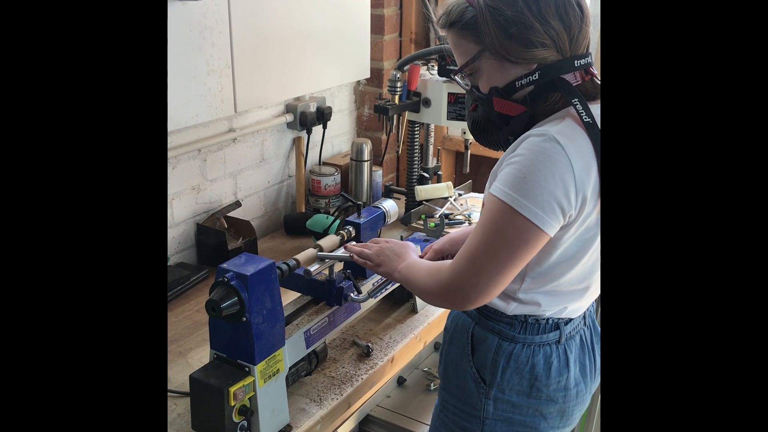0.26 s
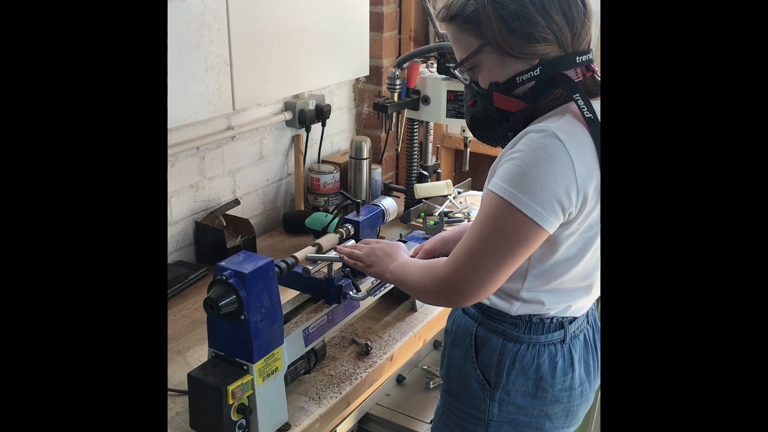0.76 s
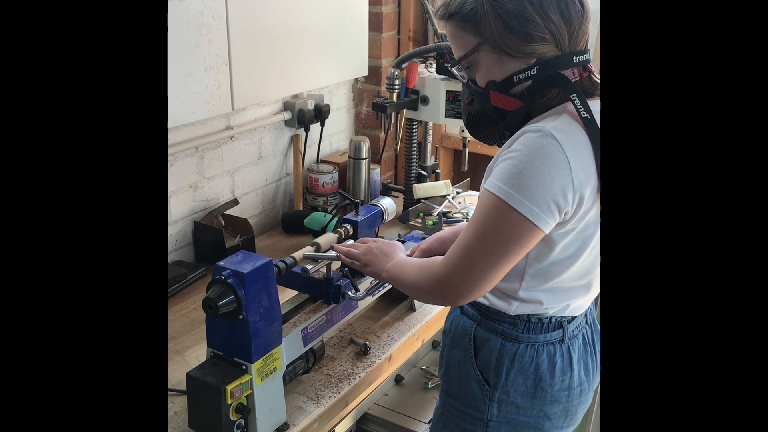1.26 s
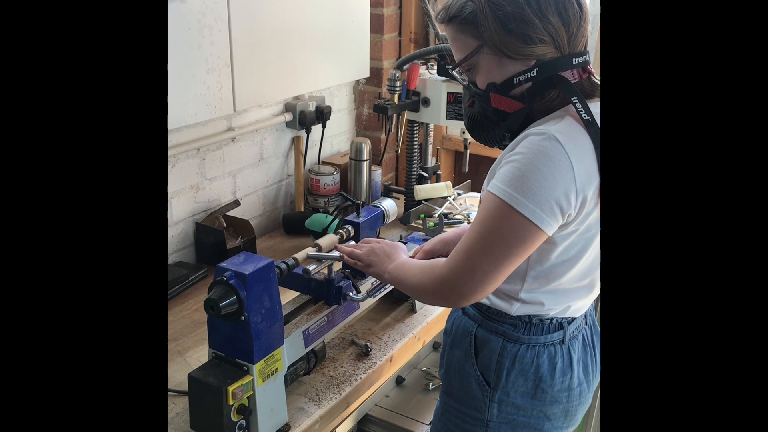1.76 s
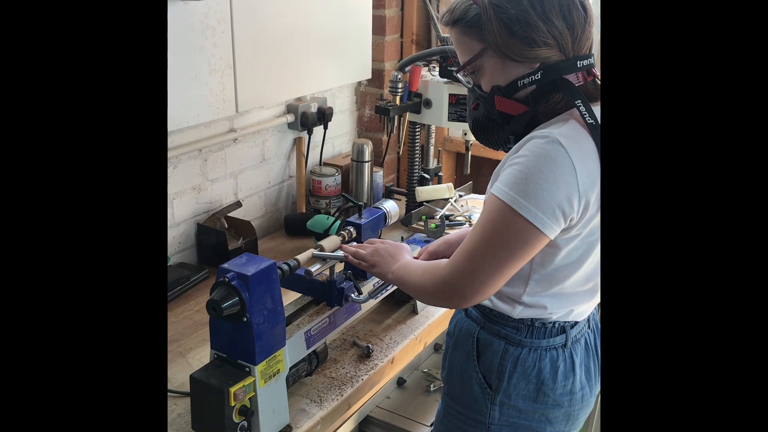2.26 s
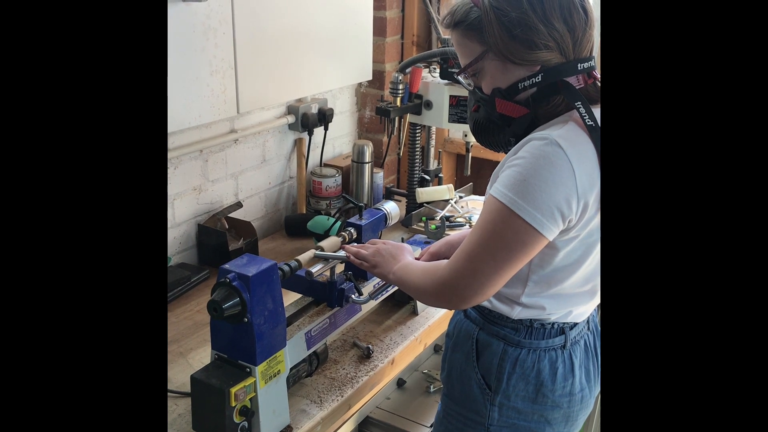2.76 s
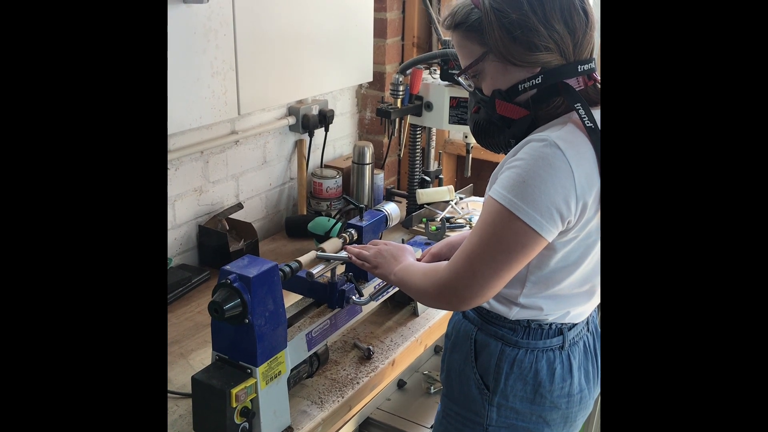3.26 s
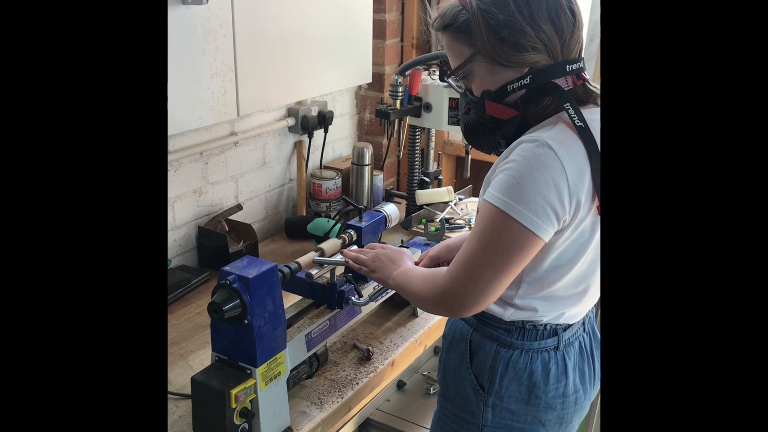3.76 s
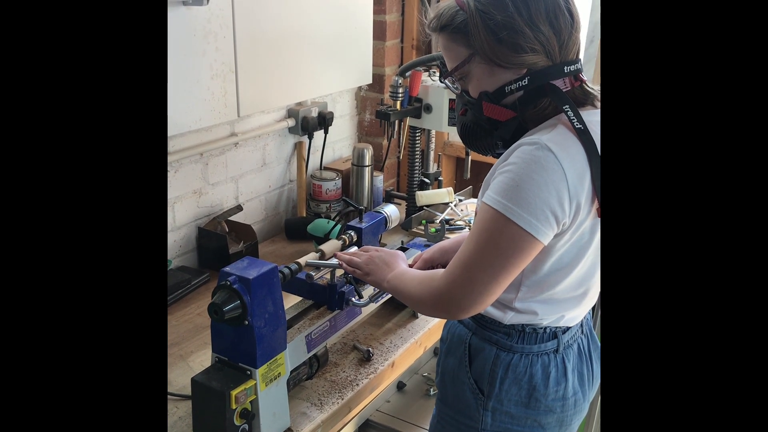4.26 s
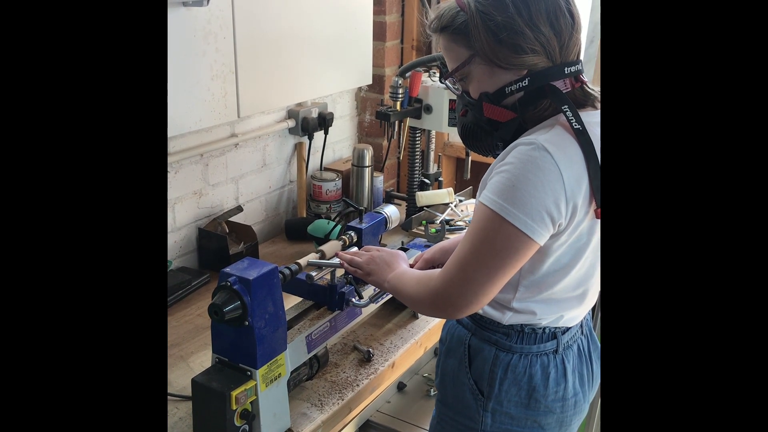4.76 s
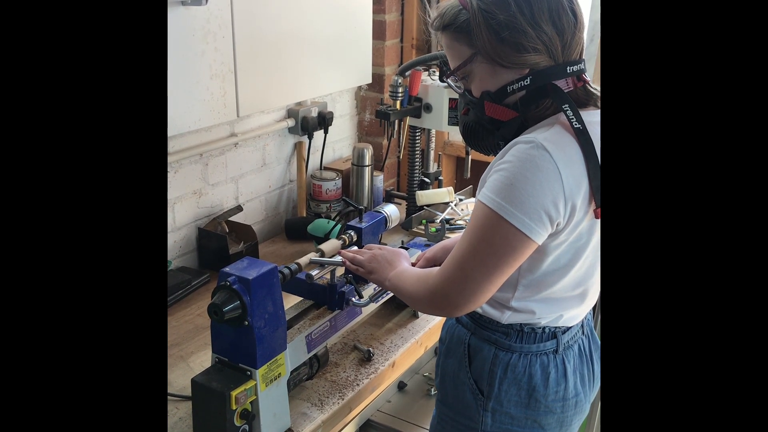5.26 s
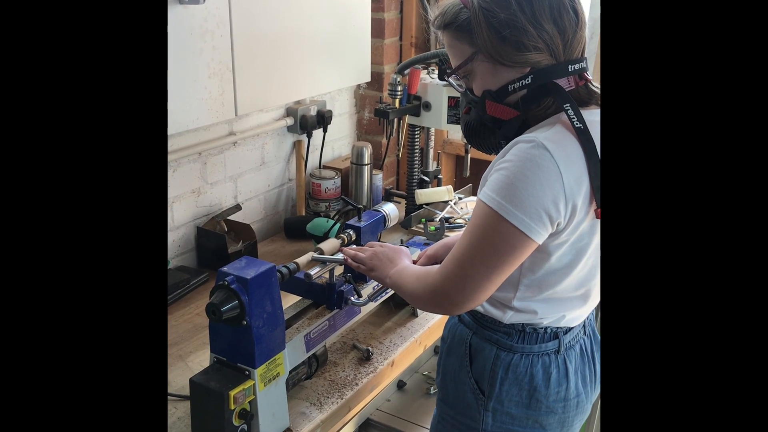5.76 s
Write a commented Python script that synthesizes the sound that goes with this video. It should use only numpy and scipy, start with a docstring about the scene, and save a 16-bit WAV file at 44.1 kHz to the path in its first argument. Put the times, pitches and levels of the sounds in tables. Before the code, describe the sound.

A small wood lathe runs throughout, heard close in a fairly dry workshop: a motor whine, a low electrical hum, a hollow drone and hissing bearings. At the very start a tool's scrape fades as it leaves the wood, and the lathe runs free. At about 1.3 seconds the tool bites into the spinning wood with a rough, hissing rasp that pulses rapidly, shaking the machine and making the steel chatter. Splinters crackle irregularly, with tiny high squeaks near 1.8 and 3 seconds. The motor's pitch sags slightly under the load. At about 3.3 seconds the tool lifts and the motor recovers. A second, slightly louder cut begins at 4.3 seconds with a brief lower squeak, chatters hardest around 4.5 seconds, throws more chips, and continues to the end at about 6 seconds.

```python
"""Wood lathe in a home workshop

Close to a small belt-driven lathe, one microphone hears motor whine, mains hum and hissing bearings.
A hand tool leaves the spinning blank, then makes two long cuts. Tearing fibres shake the lathe bed,
ring the tool and hiss; a high spot on the blank bites once a turn, and the load slows the motor."""
import sys
import numpy as np
from scipy import signal
from scipy.fft import rfft, irfft
from scipy.io import wavfile
from scipy.ndimage import uniform_filter1d

SR = 44100
rng = np.random.default_rng(int(sys.argv[2]) if len(sys.argv) > 2 else 0)


def int16_out(signal):
    """Quantize to a 16-bit WAV file."""
    q = np.round(np.clip(np.atleast_2d(signal).T, -1, 1) * 32767)
    wavfile.write(sys.argv[1], SR, q.astype(np.int16))


N = 264592
TIME = np.arange(N) / SR
BINS = np.fft.rfftfreq(16384, 1 / SR)
IDLE_HZ, ROTOR_SLOTS = 28.39, 24  # of the motor
PULLEY_RATIO = .607  # spindle turns for each motor turn

# Passes of the tool. Each row: times in seconds at which it touches, starts to lift and chatters most,
# then that chatter in dB relative to the cut.
TOOL_PASSES = [(-.5, .02, -4, -13), (1.256, 3.254, 1.57, -3), (4.321, 6.1, 4.5, 0)]
# How the hand guides the tool. Each row: time in seconds, strength in dB, depth (extra shake) in dB,
# sharpness (extra hiss) in dB, runout (bite of the high spot) in dB, place of the high spot in turns.
HAND_LIFT_OFF = [(0.0034, -29.5, -4, -5.5, 2.5, 0.81)]
HAND_FIRST_CUT = [(1.25, -37.5, -8, 4.5, 13, 0.56), (1.31, -28.5, -3, -7, 20.6, 0.49),
                  (1.6, -29, -6.5, -3, 6.1, 0.067), (1.87, -27, -2, -3.5, 3.9, 0.24),
                  (2.28, -29, -1.5, -3, 4.4, 0), (2.56, -28.5, -1.5, -4, 8.9, 0.00054),
                  (2.87, -27.5, 0.5, -6, 14, 0.011), (2.97, -31.5, -0.5, 1.5, 3.7, 0.077),
                  (3.22, -29.5, 0.5, -7.5, 18, .0)]
HAND_SECOND_CUT = [(4.33, -28.5, -10.5, -3.5, 2, .8), (4.55, -26, -3, -6, 3.3, 0.33),
                   (4.76, -24.5, -6, -8.5, 5.9, 0.19), (5.13, -25, -3, -7, 4.9, .45),
                   (5.19, -30.5, -2, -5, 2.9, 0.96), (5.27, -25, -6, -6, 1, 0.4),
                   (5.72, -26, -1, -6, 6.5, 0.51), (5.83, -31.5, -0.5, -3.5, 16, 0.48),
                   (6, -25.5, -1.5, -3.5, 6.1, 0.7)]
# The edge catches and a chip flies. Each row: start in seconds, jolt in dB, splinter level in dB.
EDGE_CATCHES = [(1.299, 0, -28), (1.406, 4, -35), (1.772, 1, -23), (1.823, 3.5, -25.5), (2.462, 3.5, -26),
                (2.579, 4.5, -30), (2.635, 3, -25.5), (2.755, 2, -26.5), (2.812, 4, -26),
                (3.226, 2.5, -30.5), (4.49, 5, -23), (4.605, 2, -21), (4.661, 4, -27), (4.886, -7, -34),
                (5.673, 1.5, -20.5), (5.737, 3, -30), (5.973, 1.5, -23.5)]
# The edge sticks and slips. Each row: middle and half length in seconds, pitch in Hz, level in dB.
EDGE_SQUEAKS = [(1.269, 0.015, 735, -31), (1.84, 0.013, 3536, -26), (2.947, 0.012, 3344, -24.5),
                (2.985, 0.055, 5110, -36), (3.079, 0.01, 3900, -26.5), (4.339, 0.027, 730, -26)]

# Resonances of the parts. Each row: frequency in Hz, width in Hz, relative level in dB.
BED_MODES = [(71.2, 9.1, -3.5), (85.5, 12, -10.5), (103.7, 16, -16), (137, 13, -11.5), (164, 19, -24.5),
             (451.2, 22.6, -7.5), (510, 76, -18)]  # lathe bed on its bench
BLANK_MODES = [(302.5, 14, -3), (319, 38, -8.5), (353.8, 48, -3), (395.4, 45, -6)]  # wood bending between its centres
REST_MODES = [(258.8, 19, 1.5), (274.5, 34.3, 2.5), (630.7, 8.3, -1.5), (762.6, 103, 0.5), (848, 152, -4.5),
              (945, 104, -1), (1008, 58, -3.5), (1135, 110, -4), (1263, 70, -11), (1343, 95, -6),
              (1544, 370, -12.5), (1636, 23, -4.5), (1720, 63, 0), (1810, 170, -11), (2190, 480, -18.5),
              (2238, 48, -6), (2360, 130, -9.5), (2454, 124, -4.5), (2634, 165, -11)]  # tool rest
SHANK_MODES = [(237.8, 8.8, 10.5), (1140, 110, -6.5), (1663, 53, 9), (1730, 84, 0), (1829, 91, 1),
               (2233, 82, -4), (2654, 76, -3.5), (5135, 100, -3), (5300, 150, -13.5), (7040, 140, -8),
               (10250, 210, -18), (11770, 180, -11.5)]
TOOL_MODES = [(3146, 50, 5), (3393, 82, 4.5), (3514, 57, 4.5), (3920, 154, 2.5), (4180, 70, 5.5),
              (5105, 72, 8), (5440, 57, -37), (5935, 78, 6), (6730, 60, 4.5), (7230, 230, 6),
              (10200, 390, -43), (11860, 760, -30.5), (15400, 500, -32)]
TING_MODES = [(5207, 66, 19), (7220, 470, 11), (9980, 130, 8.5), (12600, 300, -2), (12300, 700, -13),
              (16000, 500, -10)]  # top of the steel's range, rung by splinters
CASING_MODES = [(735, 32, 2), (717, 53, -3)]  # motor casing
HOUSING_MODES = [(145, 51, 3), (264, 45, -0.5), (846, 160, -9.5), (1139, 40, -5), (1370, 68, -8),
                 (2390, 43, -41), (4153, 144, -7.5), (4600, 54, -9), (4975, 210, -5), (5420, 180, -2),
                 (6180, 120, -14.5), (6100, 410, -8.5), (7640, 310, -4), (8320, 560, -3.5), (8480, 44, -1),
                 (9330, 79, -14), (11020, 120, -6), (11730, 230, -2.5), (13960, 220, -24)]  # bearing housing
# Broad noise colours. Each row: frequency in Hz, relative spectral density in dB.
RASP_SPECTRUM = [(1500, -33), (2800, -6), (4500, -3), (6500, -4), (7400, -33), (8200, -39.5), (10000, -34),
                 (12500, -45), (15500, -16)]  # tearing fibres
SPLINTER_SPECTRUM = [(200, -6), (750, -3), (1900, 0.5), (3000, 0), (5000, 7), (7300, -2.5), (8500, -2),
                     (12000, -2.5), (15500, -19)]
RUNNING_SPECTRUM = [(15, -77), (25, -13), (91, -8), (194, -10.5), (403, -10.5), (557, -12), (729, -15),
                    (1040, -14), (1360, -13.5), (1590, -14.5), (2260, -14), (2660, -13.5), (3680, -19.5),
                    (8270, -11.5), (15800, -17.5)]  # rubbing in the machine

# Whine of the rotor slots. Each entry: level in dB of harmonic 1, 2, 3, ..
SLOT_WHINE_DB = [-63, -56.5, -53, -47.5, -60.5, -73, -60.5, -73, -55.5, -55.5, -53.5, -67]
# Tones of bearings and drive. Each row: multiple of the motor speed, level in dB.
SHAFT_TONES = [(10.88, -58), (13.83, -54.5), (14.5, -55), (26.06, -52), (28.95, -57.5), (32.55, -60),
               (34, -60.5), (52.6, -84), (168, -63), (203.6, -51.5), (264, -71), (392.7, -58.5)]
# Drone of the motor casing. Each row: time in seconds, level in dB.
DRONE_LEVELS = [(0, -51), (3.4, -50), (3.7, -47), (4.3, -47), (6, -50)]
# Decay of the workshop. Each row: frequency in Hz, seconds to fall by 60 dB.
ROOM_DECAY = [(100, 0.13), (500, 0.082), (3000, 0.6), (12000, 0.19)]


def cutting(turns, bed_db=-12, casing_db=-4, tool_db=-.5, rattle_db=2.2):
    """The cutting force shakes bed, blank and casing, rings rest and shank, and hisses at the edge."""
    strength, depth, sharpness, *_ = hand()
    spindle = PULLEY_RATIO * turns
    tearing = fibres(spindle, memory=.5, snaps_per_s=2400, spread_db=2.5)
    shaving = fibres(spindle, memory=.37, snaps_per_s=9000, spread_db=4)
    # the edge meets the high spot abruptly; the heavy bed answers more slowly
    shake = tearing * throb(spindle, follow=.61, rise_s=.0064, fall_s=.0078, lag_s=.002, uneven_db=.3)
    push = tearing * throb(spindle, follow=.96, rise_s=.0055, fall_s=.015, lag_s=-.0041, uneven_db=1.5)
    scrape = unit_rms(shaving + .8 * tearing)
    scrape *= throb(spindle, follow=.96, rise_s=.0055, fall_s=.029, lag_s=-.011, uneven_db=3)
    chatter_db = strength + shank_chatter() + rattle_db * wander(21)
    steel = resonances(TOOL_MODES) + broad_power(RASP_SPECTRUM)
    return (ring(gain_of(bed_db + strength + .31 * depth) * shake, resonances(BED_MODES))
            + ring(gain_of(strength + 2.1 * depth) * shake, resonances(BLANK_MODES))
            + ring(gain_of(casing_db + strength + 1.08 * depth) * push, resonances(CASING_MODES))
            + ring(gain_of(strength) * push, resonances(REST_MODES))
            + ring(gain_of(chatter_db) * push, resonances(SHANK_MODES))
            + ring(gain_of(tool_db + strength + sharpness) * scrape, steel))


def fibres(spindle, memory, snaps_per_s, spread_db, cells_per_turn=2620):
    """Fibres snap round the blank; part of the same grain comes back on the next turn."""
    shape = (int(N / cells_per_turn * 1.5), cells_per_turn)
    snaps = gain_of(spread_db * np.minimum(rng.exponential(1, shape), 4)) * rng.choice([-1, 1], shape)
    snaps *= rng.random(shape) < snaps_per_s / SR
    surface = signal.lfilter([1], [1, -memory], snaps, axis=0).ravel()
    return unit_rms(surface[(spindle * cells_per_turn).astype(int) % len(surface)])


def throb(spindle, follow, rise_s, fall_s, lag_s, uneven_db, jolt_peak_s=.01):
    """Once a turn the high spot takes the load, then the edge runs light; a catch adds a jolt."""
    *_, runout, place = hand()
    turn_s = 1 / (PULLEY_RATIO * IDLE_HZ)
    turn_samples = int(turn_s * SR)
    since_s = (spindle - place - lag_s / turn_s) % 1 * turn_s
    bite = np.exp(-(since_s / fall_s) ** 2) + np.exp(-((turn_s - since_s) / rise_s) ** 2)
    force = gain_of(follow * runout * (1 + .15 * wander(8)) * bite + uneven_db * wander(28))
    mean_power = uniform_filter1d(uniform_filter1d(force ** 2, turn_samples), turn_samples)
    jolt_db = np.zeros(N)
    for start, db, _ in EDGE_CATCHES:
        near = slice(int(start * SR), int(start * SR) + turn_samples)
        age = (TIME[near] - start) / jolt_peak_s
        jolt_db[near] += db * age * np.exp(1 - age)
    return force / np.sqrt(mean_power) * gain_of(follow * jolt_db)


def shank_chatter(build_db_per_s=18, settle_db_per_s=17):
    """The shank's rattle, in dB relative to the cut, builds and then settles as the tool beds in."""
    return np.max([db + contact(start, end)
                   - build_db_per_s * np.maximum(peak - TIME, 0)
                   - settle_db_per_s * np.maximum(TIME - peak, 0)
                   for start, end, peak, db in TOOL_PASSES], axis=0)


def hand():
    """The hand's strength, depth and sharpness, with the high spot's runout and place, per sample."""
    strength, *others = curves(HAND_LIFT_OFF + HAND_FIRST_CUT + HAND_SECOND_CUT)
    return strength + touch(), *others


def contact(start, end, enter_db_per_s=900.5, lift_db_per_s=209.5):
    """Grip of the edge in one pass, in dB: it enters quickly, holds, and lifts away."""
    return -enter_db_per_s * np.maximum(start - TIME, 0) - lift_db_per_s * np.maximum(TIME - end, 0)


def touch():
    """Grip of the edge over all passes, in dB."""
    return np.max([contact(start, end) for start, end, *_ in TOOL_PASSES], axis=0)


def chips(fade_s=.015, small_per_s=25, small_db=-3):
    """Each splinter is a fading crackle that rings the steel; small ones fly at random during a cut."""
    strength, _, sharpness, *_ = hand()
    breaks = gain_of(strength + sharpness + small_db) * 2 * rng.random(N)
    breaks *= rng.random(N) < small_per_s / SR
    for start, _, db in EDGE_CATCHES:
        breaks[int(start * SR)] += gain_of(db)
    burst = np.sqrt(signal.lfilter([1], [1, -np.exp(-2 / (fade_s * SR))], breaks ** 2))  # powers add
    crackle = unit_rms(rng.standard_normal(N) * (rng.random(N) < 5000 / SR))
    return ring(burst * crackle, resonances(TING_MODES) + broad_power(SPLINTER_SPECTRUM))


def squeaks(waver_rad=.13):
    """The edge sticks and slips, and one resonance sings a short, rough tone."""
    slip = waver_rad * wander(120)
    grip = 1 + np.tanh(wander(201.4)) / 2
    out = np.zeros(N)
    for middle, half_s, hz, db in EDGE_SQUEAKS:
        envelope = gain_of(db) * np.exp(-((TIME - middle) / half_s) ** 2)
        out += envelope * np.sin(2 * np.pi * hz * TIME + slip)
    return grip * out


def loaded():
    """1 while the tool brakes the blank, 0 while the lathe runs free."""
    return 1. * (touch() > -12)


def shaft_turns(sag_hz=.93, makeup_hz=.27, belt_hz=4.4):
    """Motor angle in turns: it slows and judders under load, and sways with each lap of the belt."""
    load = loaded()
    speed = IDLE_HZ - sag_hz * lagged(load, lag_s=.05)
    speed += makeup_hz * lagged(load, lag_s=.45)  # the speed control wins some back
    sway = .0016 * np.cos(2 * np.pi * belt_hz * (TIME - .3))
    judder = .0004 * wander(40) + .006 * load * wander(25)
    return np.cumsum(speed * (1 + sway + judder)) / SR


def motor(turns, mains_hz=100.1, mains_db=-51.5, waver_db=1.2, flutter_rad=.43):
    """Slot whine and drive tones follow the shaft, over a steady mains hum."""
    # the strongest whine harmonic fades under load and swells back
    swell_db = 3.5 - 7 * lagged(loaded(), lag_s=.47)
    whine = [(ROTOR_SLOTS * harmonic, db + swell_db * (db == max(SLOT_WHINE_DB)))
             for harmonic, db in enumerate(SLOT_WHINE_DB, 1)]
    out = gain_of(mains_db) * np.sin(2 * np.pi * mains_hz * TIME)
    for multiple, db in whine + SHAFT_TONES:
        phase = 2 * np.pi * (multiple * turns + rng.random()) + flutter_rad * wander(26)
        out += gain_of(db + waver_db * wander(4.6)) * np.sin(phase)
    return np.sqrt(2) * out


def bearings(turns, broad_db=-42, housing_db=-41):
    """Rubbing noise pulses with the shaft and rings the housing."""
    angle = 2 * np.pi * turns
    pulsing = 1 + .24 * np.cos(angle) + .045 * np.cos(2 * angle) + .24 * np.cos(ROTOR_SLOTS / 2 * angle)
    rub, roll = (unit_rms(pulsing * rng.standard_normal(N)) for _ in range(2))
    return (gain_of(broad_db) * ring(rub, broad_power(RUNNING_SPECTRUM))
            + gain_of(housing_db) * ring(roll, resonances(HOUSING_MODES)))


def casing(turns):
    """The motor casing gives a hollow drone that throbs once a turn."""
    level_db, = curves(DRONE_LEVELS)
    drone = ring(rng.standard_normal(N), resonances(CASING_MODES))
    return gain_of(level_db) * unit_rms((1 + .37 * np.cos(2 * np.pi * turns)) * drone)


def workshop(direct, wet_db, echoes_per_s=3000):
    """Scattered reflections from bench and walls reach the microphone just after the direct sound."""
    t = np.arange(SR // 2) / SR
    echoes = rng.choice([-1., 1.], len(t)) * (rng.random(len(t)) < echoes_per_s / SR) * (t > .003)
    hz, age_s, spectra = signal.stft(echoes, SR, nperseg=256)
    decay = gain_of(-60 * age_s / at_frequency(ROOM_DECAY, hz)[:, None])
    _, tail = signal.istft(spectra * decay, SR, nperseg=256)
    reflected = signal.fftconvolve(direct, tail / np.linalg.norm(tail))[:N]
    wet = gain_of(wet_db)
    return (direct + wet * reflected) / np.hypot(1, wet)


def ring(force, power):
    """Passes a force through a causal body of unit energy with the given power response."""
    log_gain = np.log(power / power.max() + 1e-10) / 2
    mirrored = np.concatenate([log_gain, log_gain[-2:0:-1]])
    minimum_phase = np.exp(np.conj(signal.hilbert(mirrored)))
    response = np.fft.ifft(minimum_phase).real[:len(BINS)]
    return signal.oaconvolve(force, response / np.linalg.norm(response))[:N]


def resonances(modes):
    """Power response of a set of steep-sided resonances."""
    return sum(gain_of(db) ** 2 / (1 + (2 * (BINS - hz) / width) ** 2) ** 2 for hz, width, db in modes)


def broad_power(spectrum):
    """Power response of a broad noise colour."""
    return gain_of(at_frequency(spectrum, BINS)) ** 2


def at_frequency(rows, hz):
    """Reads a table along a log-frequency axis."""
    row_hz, values = np.transpose(rows)
    return np.interp(np.log(hz + 1), np.log(row_hz + 1), values)


def curves(rows):
    """Each column of a time table, at every sample."""
    times, *columns = np.transpose(rows)
    return [np.interp(TIME, times, column) for column in columns]


def wander(rate_hz):
    """Random drift of rms 1, mostly slower than the given rate."""
    low_pass = 1 + (np.fft.rfftfreq(N, 1 / SR) / rate_hz) ** 4
    return unit_rms(irfft(rfft(rng.standard_normal(N)) / low_pass, N))


def lagged(x, lag_s):
    """Follows a control with a first-order lag."""
    keep = np.exp(-1 / (lag_s * SR))
    return x[0] + signal.lfilter([1 - keep], [1, -keep], x - x[0])


def gain_of(db):
    """Decibels to amplitude."""
    return 10 ** (np.asarray(db) / 20)


def unit_rms(x):
    """Scales to rms 1."""
    return x / np.sqrt(np.mean(x ** 2) + 1e-20)


def scene():
    """The cut sounds close; the boxed-in bearings reach the microphone largely by reflection."""
    turns = shaft_turns()
    machine = motor(turns) + casing(turns) + workshop(bearings(turns), wet_db=-2)
    edge = cutting(turns) + chips() + squeaks()
    return (machine + workshop(edge, wet_db=-9.5))[None]


def record(dry, low_cut_hz=48, band_limit_hz=15730):
    """The microphone's bass roll-off and the recorder's band limit, in mono."""
    low_cut = signal.butter(3, low_cut_hz, btype="high", fs=SR, output="sos")
    band_limit = signal.firwin(1023, band_limit_hz, window=("kaiser", 9), fs=SR)
    return signal.oaconvolve(signal.sosfilt(low_cut, dry), band_limit[None], "same")


dry = scene()
out = record(dry)
int16_out(out)
```